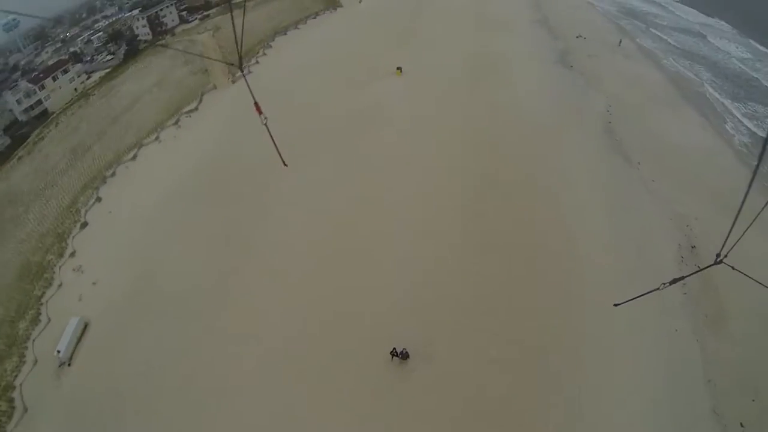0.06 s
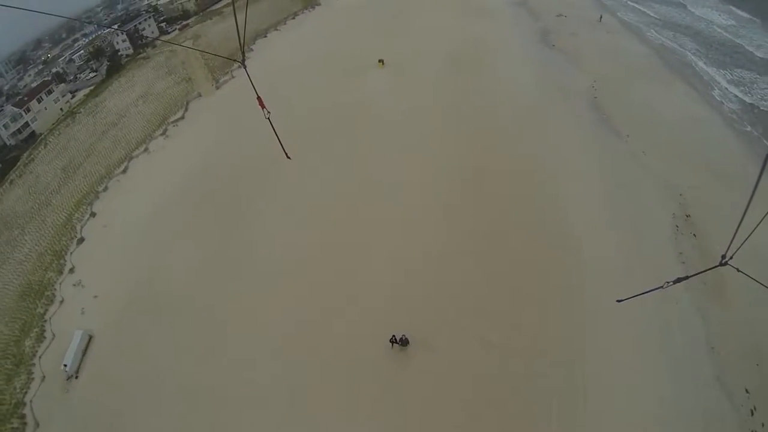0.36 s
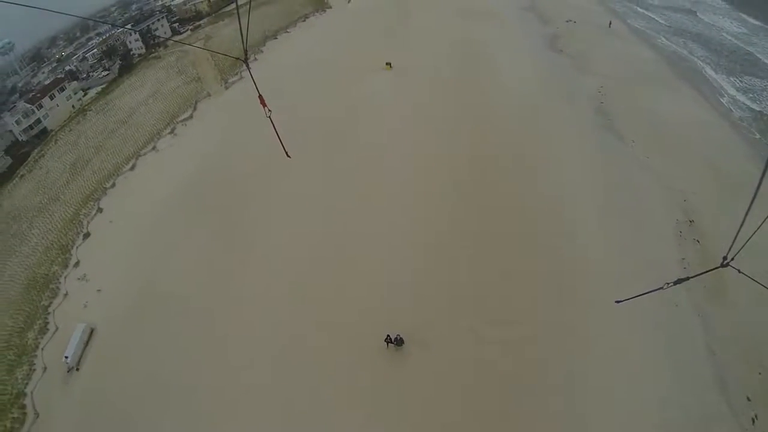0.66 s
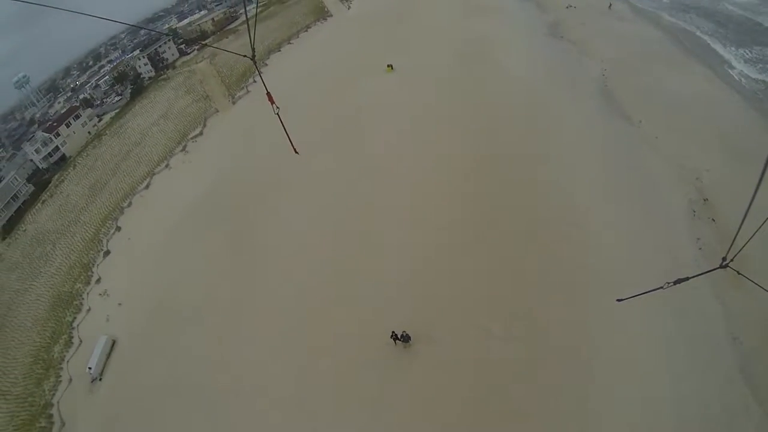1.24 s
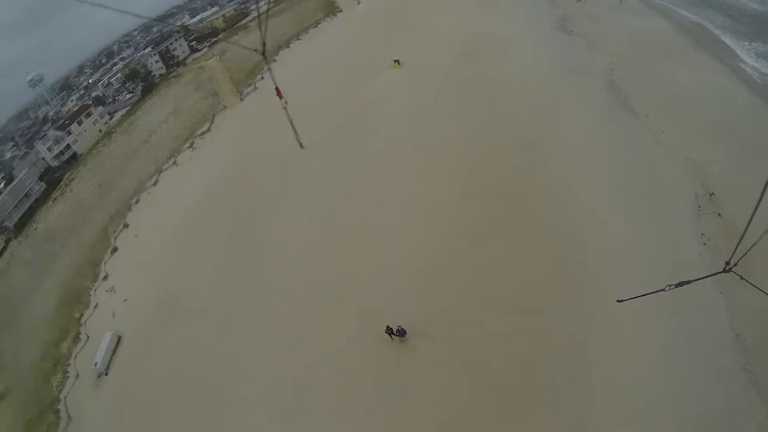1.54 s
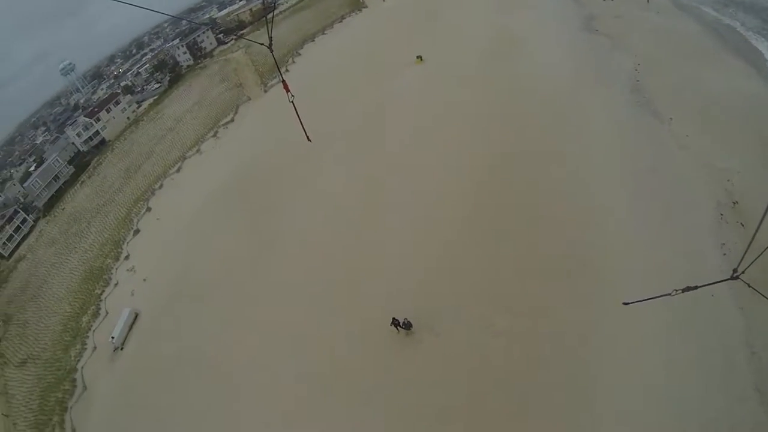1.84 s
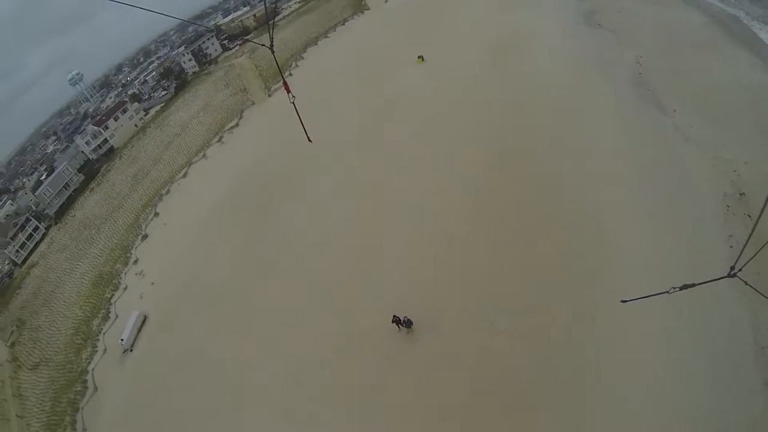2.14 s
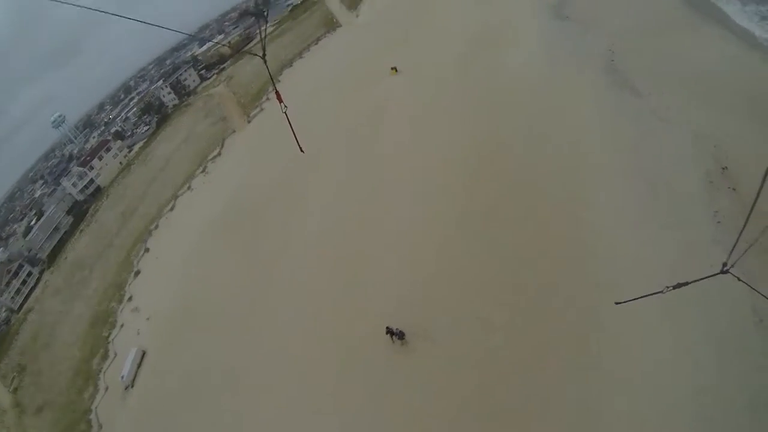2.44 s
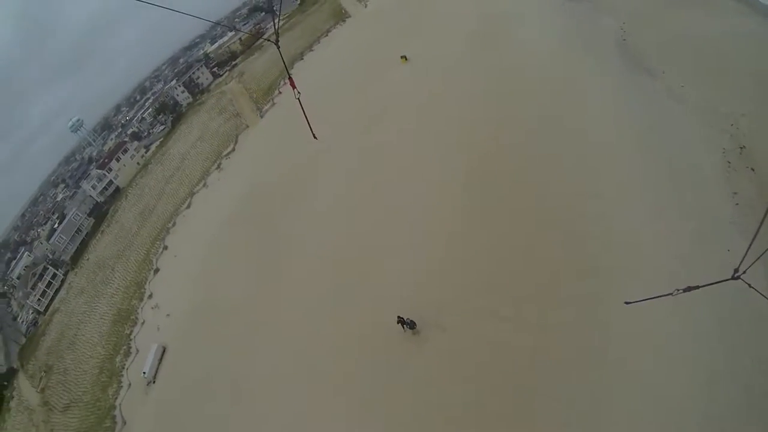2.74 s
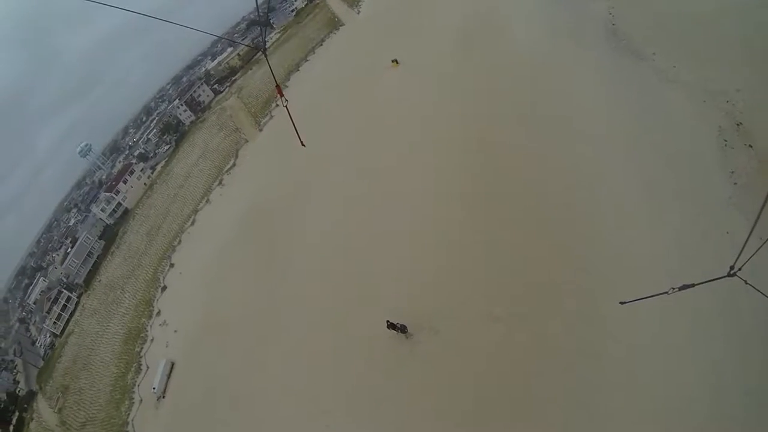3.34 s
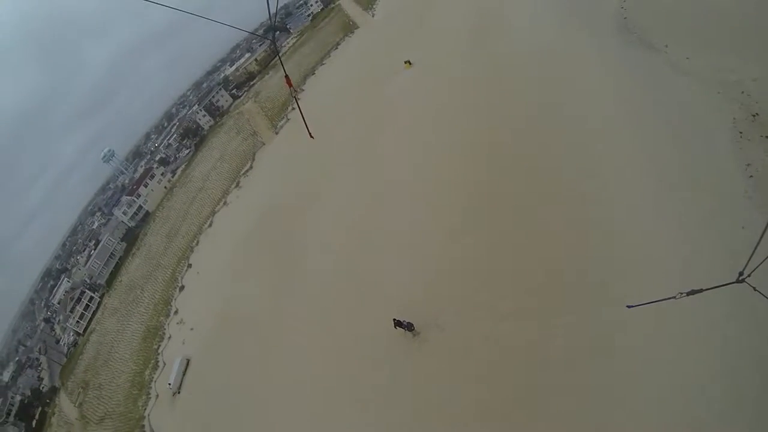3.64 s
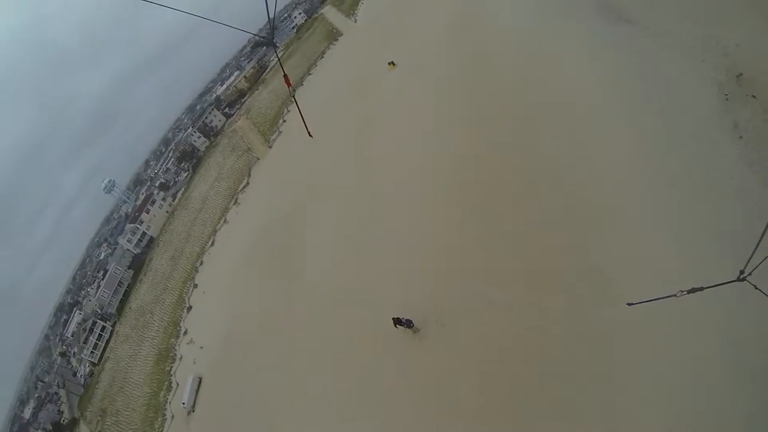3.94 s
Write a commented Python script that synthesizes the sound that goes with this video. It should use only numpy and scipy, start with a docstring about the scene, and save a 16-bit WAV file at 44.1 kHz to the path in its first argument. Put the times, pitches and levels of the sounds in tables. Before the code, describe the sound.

Wind drones and rushes around a flying kite while its lines whistle faintly.

```python
"""A low, buffeting wind hum with rushing air and thin whistles: a camera on a kite high over a beach.
Turbulence drives the rig's low resonances, air rushes round the hollow case, the lines shed vortices.
Now and then an eddy hisses across the microphone port.
The rig knocks once, creaks once and ticks, over a faint steady hiss."""
import sys
import numpy as np
from scipy import signal
from scipy.fft import rfft, irfft, next_fast_len
from scipy.io import wavfile
from scipy.ndimage import uniform_filter1d, minimum_filter1d, map_coordinates

SR = 44100
rng = np.random.default_rng(int(sys.argv[2]) if len(sys.argv) > 2 else 0)


def waveform_to_disk(signal):
    """Save audio, clipped to [-1, 1], as 16-bit WAV at the path in sys.argv[1]."""
    frames = np.transpose(np.atleast_2d(signal))
    scaled = np.clip(frames, -1, 1) * 32767
    samples = np.round(scaled).astype(np.int16)
    wavfile.write(sys.argv[1], SR, samples)


N = 176400


def amp(db):
    """Decibels to gain."""
    return 10 ** (np.asarray(db) / 20)


def unit(x):
    """Scale to rms 1."""
    return x / np.sqrt(np.mean(np.abs(x) ** 2) + 1e-20)


def steady(x, size):
    """Hold x near rms 1 over windows of size samples."""
    local_power = np.abs(uniform_filter1d(unit(x) ** 2, size=size))
    return x / np.sqrt(local_power + 1e-6) / x.std()


def colour(points):
    """Response through (frequency [Hz], gain [dB]) points, log frequency axis."""
    f, db = np.transpose(points)
    return lambda hz: amp(np.interp(np.log(hz + 1), np.log(f + 1), db))


def curves(rows):
    """Per-sample curve of each column after the time."""
    times_s, *columns = np.transpose(rows)
    return [np.interp(np.arange(N) / SR, times_s, column) for column in columns]


def wobble(rate_hz):
    """Smooth random curve, rate_hz knots a second."""
    grid_s = np.linspace(0, N / SR, N // 16)
    coarse = map_coordinates(rng.standard_normal(size=4000), [grid_s * rate_hz], mode="wrap")
    return np.interp(np.arange(N) / SR, grid_s, coarse)


def filtered(x, response):
    """Apply a frequency response, zero phase."""
    size = next_fast_len(N + SR // 2)
    return irfft(rfft(x, size) * response(np.fft.rfftfreq(size, 1 / SR)), size)[:N]


def noise(response):
    """Shaped noise, rms 1."""
    return unit(filtered(rng.standard_normal(N), response))


def since(start_s):
    """Seconds since start_s, zero before."""
    return np.maximum(np.arange(N) / SR - start_s, 0)


def swell(peak_s, sigma_s):
    """Gaussian envelope, peak 1."""
    return np.exp(-.5 * ((np.arange(N) / SR - peak_s) / sigma_s) ** 2)


def rig_drone():
    """Turbulence shakes the rig's low resonances; four registers swell independently."""
    # rig resonances (frequency [Hz], half width [Hz], gain [dB])
    modes = [(25.7, 1.7, -5), (62.5, 7.1, 0), (120.2, 11, 2), (161, 15, -13.5), (196, 31, -13.5),
             (234, 8.2, -23), (271, 10, -7.5)]
    # overall roll-off (frequency [Hz], gain [dB])
    skirt = [(12, -12.5), (25, -0.5), (280, -1.5), (330, -9.5), (600, -28), (1500, -63.5), (4000, -100)]
    # register envelopes before trim (time [s], level [dB])
    deep = [(0.17, -31), (0.49, -39.5), (1.94, -24), (2.07, -33), (2.35, -15), (2.4, -22), (3.25, -31.5),
            (3.99, -27)]
    low = [(0.17, -24), (0.2, -27.5), (1.9, -19), (2.05, -32), (2.29, -15), (2.39, -27.5), (2.65, -11),
           (2.68, -24.5), (3.61, -17.5), (3.78, -30), (3.81, -17), (3.87, -36), (3.99, -17)]
    main = [(0.17, -22), (0.33, -31), (0.4, -18), (0.54, -22.5), (1.94, -17), (2.01, -25.5), (2.19, -12),
            (2.38, -23.5), (2.47, -19.5), (3.06, -15.5), (3.08, -24.5), (3.55, -16), (3.69, -23.5),
            (3.99, -18)]
    upper = [(0, -31.5), (.3, -27.5), (.8, -25.5), (1.5, -23.5), (2.05, -24.5), (2.25, -20), (2.9, -21),
             (3.3, -22), (3.8, -26), (4, -25)]
    # registers, lowest first: (trim [dB]) and (band edge [Hz])
    trims_db = [-0.67, 0.14, -0.17, -0.2]
    edges_hz = [10, 42, 87, 172, 1500]
    floor_db = -18.5  # rumble between the resonances
    peaks = lambda f: sum(amp(db) / (1 + ((f - hz) / width_hz) ** 2) for hz, width_hz, db in modes)
    hum = noise(lambda f: (amp(floor_db) + peaks(f)) * colour(skirt)(f))
    below = lambda f, edge_hz: 1 / (1 + (f / edge_hz) ** 20)
    drone = np.zeros(N)
    for envelope, trim_db, lo_hz, hi_hz in zip((deep, low, main, upper), trims_db, edges_hz, edges_hz[1:]):
        band = filtered(hum, lambda f: below(f, hi_hz) - below(f, lo_hz))
        drone += amp(curves(envelope)[0] + trim_db) * steady(band, size=SR // 6)
    return drone


def case_rush(split_hz=2100, trim_db=2):
    """Air flows round the case, coloured by its cavity; body and treble flutter separately."""
    # air flow before trim (time [s], level [dB])
    flow = [(0, -34), (.25, -35.5), (.7, -33), (1.4, -30), (1.9, -30.5), (2.25, -29), (2.6, -29),
            (2.85, -30.5), (3.25, -29), (3.55, -31), (4, -33)]
    # treble against body (time [s], gain [dB])
    tilt = [(0, 1), (.5, 0.5), (1, -0.5), (1.5, 0), (2, -0.5), (2.5, -1), (2.9, 2), (3.3, -1), (4, 0)]
    # cavity response (frequency [Hz], gain [dB])
    cavity = [(40, -13.5), (200, -4), (390, 1.5), (490, -3), (600, 1.5), (740, -4), (900, -10.5),
              (1100, -6), (1270, 2.5), (1520, -0.5), (1700, -6.5), (1900, -15.5), (2280, -14), (2620, -18),
              (3080, -19.5), (3350, -29.5), (3700, -31.5), (4000, -33.5), (4600, -42.5), (5500, -45.5),
              (6400, -56), (9000, -70), (16000, -78)]
    flow_db, = curves(flow)
    tilt_db, = curves(tilt)
    air = noise(colour(cavity))
    body = filtered(air, lambda f: 1 / (1 + (f / split_hz) ** 10))
    treble = air - body
    body_db = 0.63 * wobble(14) + 0.67 * wobble(130)
    treble_db = tilt_db + 1.8 * wobble(20)
    return amp(flow_db + trim_db) * (body * amp(body_db) + treble * amp(treble_db))


def whistle(track, half_width_hz, waver_hz, flutter_db, steepness):
    """Vortex shedding: a narrow noise band wavering about a pitch track."""
    pitch_hz, level_db = curves(track)
    real, imag = rng.standard_normal((2, N))
    offset_hz = np.fft.fftfreq(N, 1 / SR)
    fuzz = np.fft.ifft((real + 1j * imag) / (1 + np.abs(offset_hz / half_width_hz) ** steepness))
    phase = 2 * np.pi * np.cumsum(pitch_hz + waver_hz * wobble(25)) / SR
    band = (fuzz * np.exp(1j * phase)).real
    return amp(level_db + flutter_db * wobble(21.88)) * steady(band, size=SR // 8)


def line_whistles():
    """Lines, bridle and strut each sing at a pitch set by their thickness."""
    # whistle tracks (time [s], pitch [Hz], level [dB])
    thin_line = [(0, 2750, -44.5), (.1, 2850, -48.5), (.2, 2740, -39.5), (.3, 2851, -41.5),
                 (.45, 2760, -37), (.7, 2750, -41), (.95, 2790, -39.5), (1.3, 2720, -50.5),
                 (1.6, 2850, -53), (1.85, 2980, -44.5), (2.2, 3120, -50), (2.5, 3200, -56),
                 (2.65, 3120, -44.5), (2.85, 3100, -57), (3.05, 3006, -42), (3.22, 3050, -43.5),
                 (3.32, 2930, -39.5), (3.47, 2950, -42.5), (3.52, 2950, -52), (3.6, 2930, -43),
                 (4, 2880, -45)]
    thick_line = [(0, 2557, -49), (.28, 2450, -57.5), (.45, 2431, -40.5), (.68, 2400, -43),
                  (.82, 2380, -36), (1, 2380, -40.5), (1.1, 2383, -31.5), (1.25, 2355, -33),
                  (1.42, 2453, -32), (1.6, 2410, -33), (1.9, 2411, -34), (2.2, 2398, -36),
                  (2.45, 2382, -41), (2.85, 2320, -43), (3.2, 2328, -39.5), (3.7, 2304, -43),
                  (4, 2343, -39)]
    bridle_cord = [(0, 5450, -58), (.12, 5650, -63.5), (.21, 5380, -60), (.3, 5750, -66.5),
                   (.42, 5430, -59), (.8, 5420, -61.5), (1.15, 5320, -65.5), (1.35, 5300, -57),
                   (1.6, 5260, -58.5), (1.75, 5300, -66.5), (2.05, 5430, -64), (2.5, 5350, -73),
                   (4, 5500, -74)]
    tether = [(0, 2069, -63), (.8, 2102, -48), (1.2, 2164, -44), (2, 2180, -58.5), (2.7, 2135, -44.5),
              (3.2, 1996, -40.5), (3.6, 2030, -47), (4, 2105, -44)]
    bridle_leg = [(0, 2574, -44), (0.201, 2600, -59), (.9, 2620, -57.5), (1.2, 2640, -44), (1.7, 2650, -46),
                  (2.2, 2660, -47.5), (2.7, 2550, -50), (3.1, 2583, -53), (4, 2545, -60)]
    strut = [(0, 3580, -77), (.9, 3538, -69), (1.4, 3527, -62), (2.2, 3603, -58), (2.7, 3580, -59),
             (3.1, 3650, -67.5), (4, 3730, -71.5)]
    return (whistle(thin_line, half_width_hz=125, waver_hz=15, flutter_db=1.4, steepness=5.4)
            + whistle(thick_line, half_width_hz=123, waver_hz=27.82, flutter_db=2.43, steepness=4.5)
            + whistle(bridle_cord, half_width_hz=210, waver_hz=25, flutter_db=0.3, steepness=2.8)
            + sum(whistle(track, half_width_hz=140, waver_hz=21.7, flutter_db=1.8, steepness=4)
                  for track in (tether, bridle_leg, strut)))


def rig_knock(start_s=.1214, ring_db=-10, thump_db=-3, contact_s=0.00012, cutoff_hz=3920):
    """A jolt of the rig rings the case and thumps the mount."""
    # modes (frequency [Hz], relative level [dB], t60 [s])
    case_modes = [(623, -37, 0.021), (1430, -0.5, 0.0103), (1610, -4, 0.029), (2150, -15.5, 0.024),
                  (3540, -26, 0.021)]
    mount_modes = [(104.4, -1, .13), (62, -16, 0.28)]
    t = since(start_s)
    ring = sum(amp(db - 60 * t / t60) * np.sin(2 * np.pi * hz * t) for hz, db, t60 in case_modes)
    thump = sum(amp(db - 60 * t / t60) * np.cos(2 * np.pi * hz * t) for hz, db, t60 in mount_modes)
    attack = 1 - np.exp(-t / contact_s)
    blow = -attack * (amp(ring_db) * ring + amp(thump_db) * thump)
    return signal.sosfilt(signal.butter(10, cutoff_hz, fs=SR, output="sos"), blow)


def line_creak():
    """A line slips in its fitting and briefly swells two case resonances."""
    # tone bursts (time [s], pitch [Hz], level [dB], sigma [s])
    bursts = [(3.001, 1494, -10.5, 0.0017), (3.004, 585, -21, 0.011)]
    t = np.arange(N) / SR
    return sum(amp(db) * swell(peak_s, sigma_s) * np.sin(2 * np.pi * hz * (t - peak_s))
               for peak_s, hz, db, sigma_s in bursts)


def port_eddies():
    """Eddies cross the microphone port in short, grainy hisses."""
    # crossings (time [s], level [dB], sigma [s])
    crossings = [(0.737, -65, 0.019), (1.584, -52, 0.014), (1.829, -71.5, .012), (2.312, -61.5, .012),
                 (2.392, -57.5, 0.027), (2.466, -51, 0.014), (2.53, -54.5, 0.023), (2.85, -55.5, 0.015),
                 (3.521, -55.5, 0.02)]
    # eddy spectrum (frequency [Hz], gain [dB])
    spectrum = [(500, -19), (2500, -7), (3600, 10), (4400, 0), (5100, 5), (6500, -4), (9000, -8),
                (13000, -11.5), (15000, -20)]
    envelope = sum(amp(db) * swell(peak_s, sigma_s) for peak_s, db, sigma_s in crossings)
    air = noise(colour(spectrum))
    grain_db = 3.3 * wobble(700) + 1.5 * wobble(110)
    return envelope * unit(air * amp(grain_db))


def fitting_ticks(t60_s=0.0066):
    """The fittings click: tiny, fast-decaying noise bursts."""
    # clicks (time [s], level [dB])
    clicks = [(1.6874, -44), (2.605, -54), (3.546, -55)]
    # click spectrum (frequency [Hz], gain [dB])
    spectrum = [(2500, -31), (4200, -2), (5600, -3), (7500, -7.5), (11000, -25), (15000, -17)]
    envelope = sum((since(s) > 0) * amp(db - 60 * since(s) / t60_s) for s, db in clicks)
    return envelope * noise(colour(spectrum))


def hiss(level_db=-68.5):
    """Faint steady hiss."""
    # hiss spectrum (frequency [Hz], gain [dB])
    spectrum = [(3000, -1), (6500, 0.5), (7800, -0.5), (8700, -4), (9600, -3.5), (10200, 6), (10600, -2),
                (11200, -9), (11800, -21), (13200, -8), (14000, -11.5), (15100, -10)]
    return amp(level_db) * noise(colour(spectrum))


def scene():
    """All sources at one microphone in open air."""
    wind = rig_drone() + case_rush() + line_whistles() + port_eddies()
    return (wind + rig_knock() + line_creak() + fitting_ticks() + hiss())[None]


def record(dry):
    """The camera's peak limiter, then its band limit."""
    ceiling, hold_s, top_hz = .88, .012, 15300
    size = int(hold_s * SR)
    needed_gain = np.minimum(1, ceiling / (np.abs(dry[0]) + 1e-9))
    gain = uniform_filter1d(minimum_filter1d(needed_gain, size), size)
    return filtered(dry[0] * gain, lambda hz: hz < top_hz)[None]


dry = scene()
out = record(dry)
waveform_to_disk(out)
```